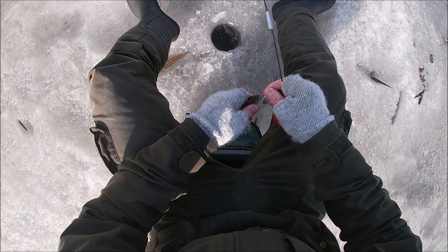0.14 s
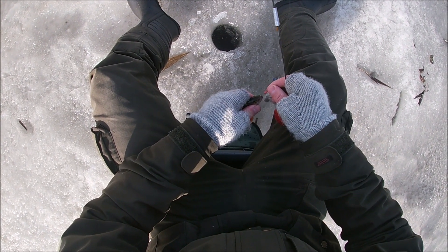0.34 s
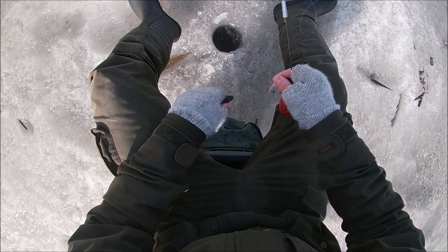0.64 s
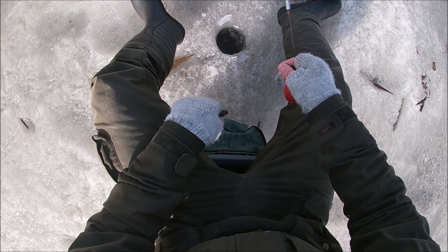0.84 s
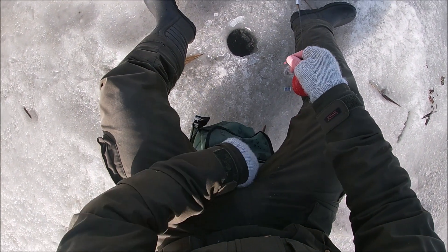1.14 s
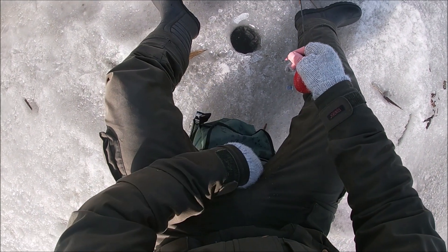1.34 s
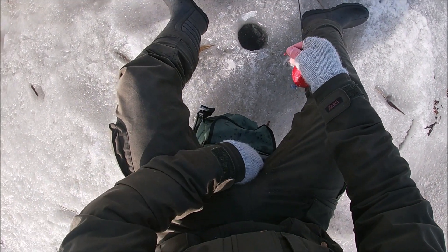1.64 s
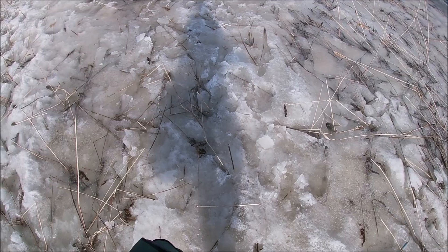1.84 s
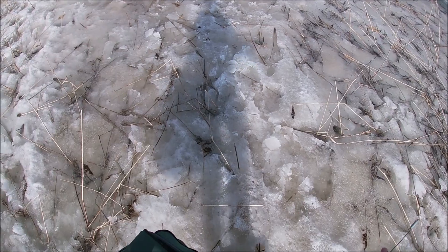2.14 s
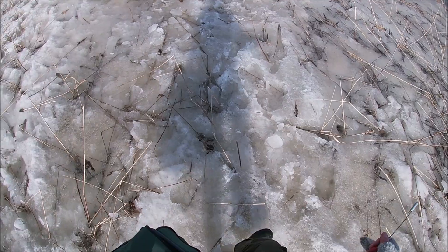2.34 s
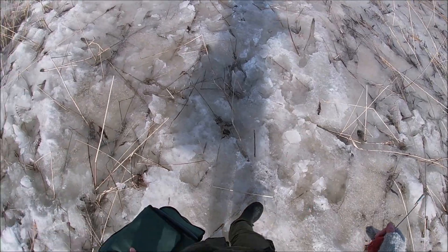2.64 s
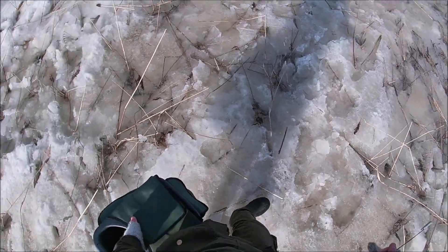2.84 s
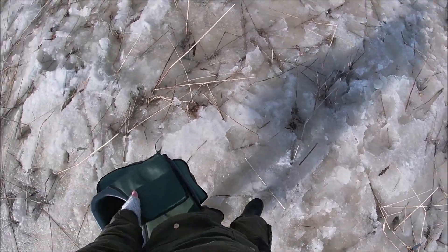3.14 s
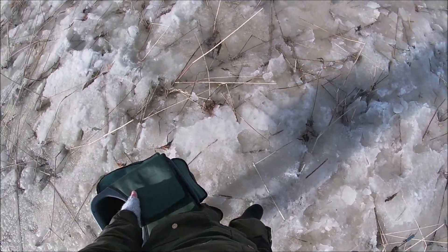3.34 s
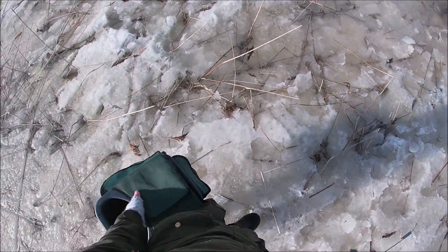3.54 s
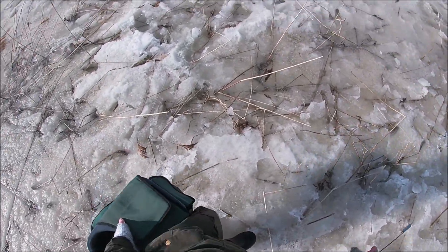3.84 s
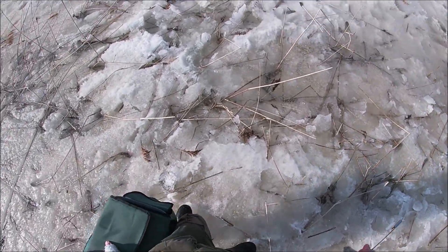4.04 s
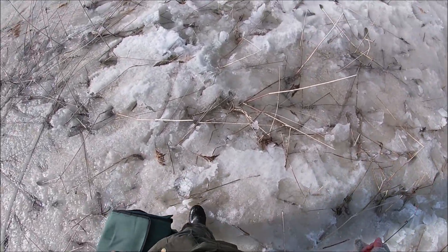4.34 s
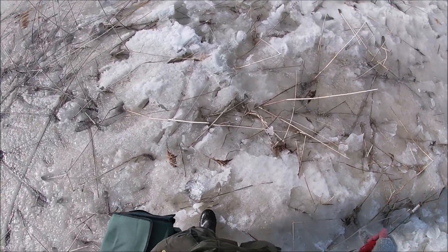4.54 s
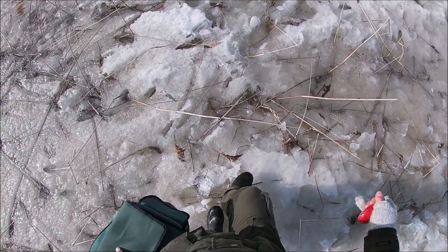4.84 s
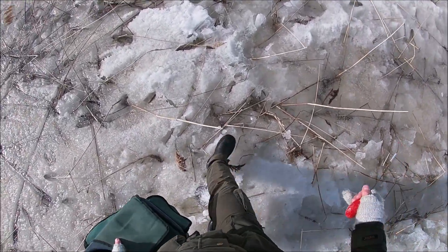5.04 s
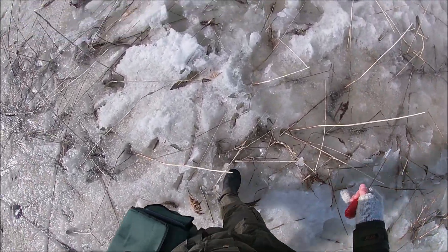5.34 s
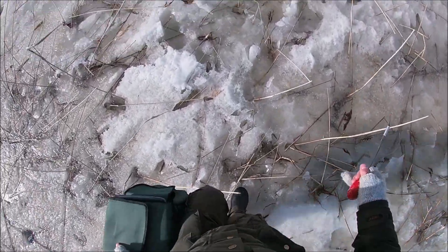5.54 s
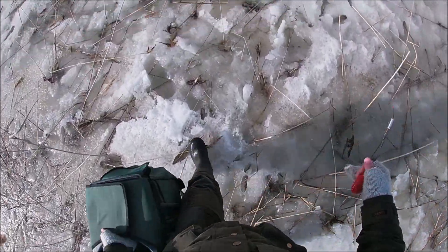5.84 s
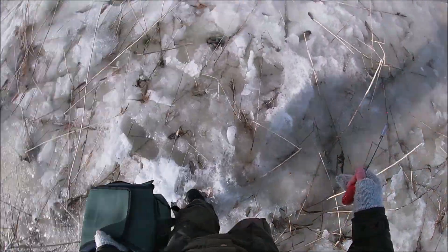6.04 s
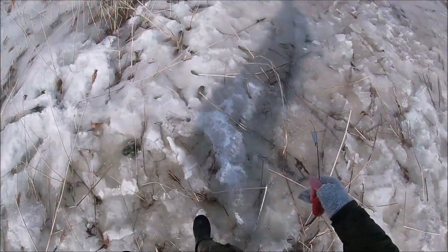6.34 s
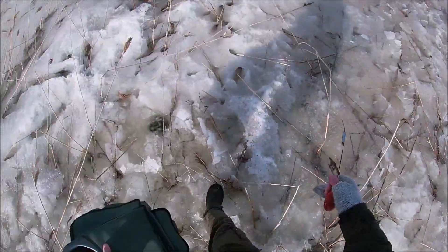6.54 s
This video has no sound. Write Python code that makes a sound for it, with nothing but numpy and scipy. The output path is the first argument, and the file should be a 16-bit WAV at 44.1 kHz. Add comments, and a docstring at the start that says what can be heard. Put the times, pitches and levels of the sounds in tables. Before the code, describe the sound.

After faint handling noise and a wind gust, clothing rubs, boots crush wet ice and dull thumps jolt the microphone.

```python
"""On sea ice, a person handles a bag, then turns and treads into slushy snow.
We hear it through a head-worn camera in a closed case, which gives nearly everything a hollow ring.
Wind buffets the case, heavy clothing rubs, boots crush wet ice grains and a few knocks jolt the mount
that holds the camera. The sound cuts out for a moment just before the first gust."""
import sys
import numpy as np
from scipy import signal
from scipy.fft import rfft, irfft
from scipy.io import wavfile
from scipy.ndimage import uniform_filter1d

SR = 44100
rng = np.random.default_rng(int(sys.argv[2]) if len(sys.argv) > 2 else 0)


def unload_audio(sound):
    """Save the sound as a 16-bit wav file, at the path given as the first command line argument."""
    columns = np.transpose(np.atleast_2d(sound))
    # keep every value between -1 and 1, then stretch to whole-number steps
    steps = np.round(np.clip(columns, -1, 1) * 32767)
    wavfile.write(sys.argv[1], SR, steps.astype(np.int16))


N = 295405
T = np.arange(N) / SR
HZ = np.fft.rfftfreq(8192, 1 / SR)
GAP_START_S, GAP_END_S = 1.695, 1.763  # the moment of silence

# The hollow ring of the case. Each row: pitch in Hz, width in Hz, boost in dB.
CASE_RESONANCES = [(312.4, 75, 4.5), (618, 150, 3), (1003, 199, 14), (1331, 317, 12.5), (1568, 130, 3.5),
                   (2080, 300, 5), (2410, 160, 6.5), (2938, 380, 14), (3350, 160, 3.5), (4150, 140, 4),
                   (4440, 90, 2), (5100, 420, 3), (6100, 1300, 8.5), (8080, 420, 5.5), (9620, 730, 6)]
# The tones of the struck mount. Each row: pitch in Hz, relative level in dB, seconds to fade by 60 dB.
MOUNT_TONES = [(526, 6, 0.018), (746, 0.5, 0.018), (894, -5.5, 0.026), (1053, -7, 0.016),
               (1310, -3.5, 0.031), (2160, -4, 0.0087)]

# How deep or bright each sound starts out. Each row: frequency in Hz, relative level in dB.
SEATED_AIR_SPECTRUM = [(60, 1.5), (250, -13), (500, -30), (750, -25), (1000, -40), (1350, -24.5),
                       (1900, -40.5), (2900, -47.5), (3700, -38), (6000, -46), (8000, -47), (10000, -45),
                       (14000, -63)]
WALKING_AIR_SPECTRUM = [(60, -6), (250, -11), (500, -23), (750, -21), (1000, -38.5), (1350, -32.5),
                        (1900, -44.5), (2900, -49), (3700, -43), (8000, -55.5), (10000, -52),
                        (14000, -60.5)]
SWAY_SPECTRUM = [(8, -8), (20, -0.5), (34, 2.5), (60, -5), (90, -16.5), (140, -34.5), (250, -40.5),
                 (500, -104)]
WIND_SPECTRUM = [(20, 2.5), (65, 8.5), (110, 2), (200, -7.5), (340, -12.5), (500, -25), (740, -16),
                 (870, -27.5), (1130, -23.5), (1500, -36), (2000, -45), (2350, -41), (2650, -43),
                 (3000, -41.5), (3650, -54), (4200, -51.5), (4900, -62), (6000, -67.5), (7500, -96)]
CLOTH_SPECTRUM = [(40, -10), (100, -4.5), (250, -11), (500, -21.5), (850, -24), (1020, -18.5), (1170, -20),
                  (1350, -22.5), (2300, -40), (3000, -49.5), (4000, -70.5), (8000, -65.5)]
RATTLE_SPECTRUM = [(60, 2.5), (200, 11), (500, -19), (800, -9), (1100, -51), (2000, -20), (4000, -9),
                   (8000, -18), (14000, -33.5)]
SLUSH_SPECTRUM = [(60, -9.5), (150, -22), (500, -13.5), (1000, -22.5), (1400, -5), (2000, -19.5),
                  (3000, -18.5), (4000, -19.5), (5200, -24.5), (6500, -37), (8200, -29.5), (12000, -46),
                  (15000, -55)]

# Things that swell and fade. Each row: start in seconds, hold in seconds, relative level in dB.
WEIGHT_SHIFTS = [(0.47, 0.046, -42.5), (0.62, 0.092, -40), (1.04, 0.035, -42), (1.25, 0.25, -44),
                 (1.64, 0.047, -37), (2.8, .15, -41), (3.25, 0.032, -30), (3.47, 0.13, -26.5),
                 (3.73, 0.15, -27.5), (4.05, 0.2, -30.5), (4.33, 0.092, -26), (4.52, 0.045, -31),
                 (4.88, 0.084, -30.5), (5.18, 0.041, -24), (5.3, 0.094, -22.5), (5.63, 0.036, -33.5),
                 (5.81, 0.024, -26), (5.94, 0.046, -15), (6.04, 0.073, -20.5), (6.59, 0.073, -23)]  # the body shakes the mount
WIND_GUSTS = [(1.76, 0.99, -42), (2.29, 0.2, -46), (3.71, 0.4, -53)]
CLOTH_STROKES = [(1.105, .015, -58.5), (1.44, 0.033, -62), (1.63, 0.073, -54.5), (2.62, 0.0098, -51.5),
                 (2.742, 0.0048, -57.5), (3.48, 0.03, -54), (3.58, 0.058, -49.5), (3.71, .1, -45),
                 (3.83, 0.078, -40), (4.02, 0.22, -44.5), (4.3, .2, -52.5), (4.56, 0.065, -55),
                 (4.72, 0.041, -47.5), (4.82, 0.22, -43.5), (5.16, 0.15, -42), (5.35, 0.22, -45.5),
                 (5.66, 0.32, -51.5), (5.95, 0.08, -41), (6.18, 0.02, -57), (6.44, 0.058, -63.5)]  # sleeves, trousers and bag

# As the head turns, a dip in the wind's tone slides down and the bass grows. Each row: time in seconds,
# dip frequency in Hz, dip depth in dB (below zero it is a boost), bass boost in dB.
HEAD_TURN = [(1.76, 1890, -5, -3), (2.301, 1700, -5, -2.5), (2.5, 1490, 6, -4), (2.65, 1510, 11, 5.5),
             (2.899, 1320, 22.5, 7)]
# Small gritty scuffs: crunches of ice, and early on a few dull scrapes of cloth. Each row: start in seconds, #
# relative level in dB, fade time in seconds, treble boost in dB.
SCUFFS = [(0.068, -52.5, 0.016, -8.5), (1.098, -51.5, 0.017, -11), (1.13, -67.5, 0.09, 5.5),
          (1.184, -51, 0.0099, -16), (1.474, -45.5, 0.0066, -14), (3.221, -49, .016, -13),
          (3.483, -51, 0.027, 2.5), (3.689, -54, 0.0069, -6), (3.754, -55, 0.0053, -2),
          (3.829, -37, 0.0044, -12.5), (3.872, -33.5, 0.0059, -16), (4.014, -52, 0.0073, -6),
          (4.171, -36, 0.009, -15), (4.367, -39, 0.0066, -10.5), (5.286, -24, 0.0045, -6),
          (5.411, -39, 0.0088, -13), (5.606, -41, 0.013, -9.5), (5.71, -50.5, 0.019, -2),
          (5.782, -47, 0.02, 9), (5.87, -46, 0.011, -1), (5.971, -27.5, 0.012, -3.5),
          (6.502, -55, 0.011, 6)]
# Blows to the mount, with two faint soft bumps of handling early on. Each row: start in seconds, # thud peak in
# dB, thud pitch in Hz, thud Q (higher rings longer), ring peak in dB, treble limit in Hz # (higher for a harder
# hit), rattle peak in dB, seconds until the rebound.
MOUNT_KNOCKS = [(0.342, -51.5, 325, 6.4, -52, 350, -49, 0.0045),
                (0.688, -67, 250, 1.5, -52, 550, -50, 0.0045),
                (1.428, -32, 302, 0.34, -34.5, 950, -41, 0.0031),
                (3.475, -9.5, 79, 2.8, -38, 170, -48, 0.0059),
                (3.486, -8, 228, 1.36, -22.5, 367, -40, 0.00223),
                (6.1084, -8.5, 199, 2.4, -9.5, 980, -17.5, 0.00415),
                (6.123, -22.5, 292, 3.3, -29, 500, -31, 0.0017),
                (6.212, -26.5, 210, 2.3, -55, 250, -44, 0.0031),
                (6.2263, -4.5, 177, 0.95, -10, 677, -20.5, 0.0028)]
# A boot presses into slush. Each row: start in seconds, hold in seconds, relative level in dB,
# crispness in dB (how strong the treble is next to that level).
BOOT_TREADS = [(3.231, 0.018, -68.5, -8.5), (3.459, 0.064, -65, -9), (3.61, .05, -62, -40),
               (3.696, 0.17, -58.5, -32), (3.867, 0.11, -56.5, -31), (4.012, 0.032, -62, -30),
               (4.176, 0.13, -57.5, -25), (4.347, 0.028, -58.5, -14.5), (4.481, 0.02, -58.5, -13),
               (4.988, .03, -63.5, -25), (5.273, 0.074, -47, -15.5), (5.544, 0.016, -63.5, -5.5),
               (5.812, 0.046, -66, -6), (5.938, 0.14, -44.5, -12.5), (6.591, 0.17, -51.5, -11)]


def amp(db):
    """Turn decibels into a number to multiply by."""
    return 10 ** (np.asarray(db) / 20)


def during(start, end, fade=0.0083):
    """1 between two times and 0 outside, with a fade at each end; all in seconds."""
    return np.clip(np.minimum(T - start, end - T) / fade, 0, 1)


def band(x, low_hz, high_hz):
    """Keep the part of a sound between two frequencies."""
    hz = np.fft.rfftfreq(N, 1 / SR)
    return irfft(rfft(x) * ((hz > low_hz) & (hz < high_hz)), N)


def unit(x, low_hz=0, high_hz=SR):
    """Scale a sound so its average strength (rms) between two frequencies is 1."""
    return x / (np.std(band(x, low_hz, high_hz)) + 1e-15)


def curve(spectrum):
    """Join the rows of a spectrum table into one curve in dB."""
    hz, db = np.transpose(spectrum)
    return np.interp(np.log(HZ + 1), np.log(hz), db)


def in_case(spectrum):
    """The same curve with the ring of the closed case added."""
    ring_db = sum(db / (1 + (2 * (HZ - hz) / width) ** 2) for hz, width, db in CASE_RESONANCES)
    return curve(spectrum) + ring_db


def colour(x, db):
    """Filter a sound by a curve in dB, so that clicks ring only after they strike."""
    log_gain = np.log(amp(np.r_[db, db[-2:0:-1]]))
    response = np.fft.ifft(np.exp(np.conj(signal.hilbert(log_gain)))).real
    return signal.oaconvolve(x, response[:len(response) // 2])[:N]


def flutter(rate_hz, depth_db):
    """A loudness that wavers at random."""
    return amp(depth_db * unit(band(rng.standard_normal(N), 0, rate_hz)))


def grains(per_s, spread_db, hiss):
    """Tiny snaps of unequal size over a smooth hiss."""
    size = amp(spread_db * np.minimum(rng.exponential(1, N), 4))
    snaps = size * rng.choice([-1, 1], N) * (rng.random(N) < per_s / SR)
    return unit(snaps) + hiss * rng.standard_normal(N)


def swells(rows, rise_s, fall_s, sag_db_per_s=0, tail_db=-100, tail_s=1):
    """Loudness that grows, holds, then falls to a faint tail; rise, fall and tail times span 20 dB."""
    t, power = T[::32], 0
    for start, hold, db in rows:
        early, late = np.maximum(start - t, 0), np.maximum(t - start - hold, 0)
        held = amp(db - 20 * early / rise_s - sag_db_per_s * np.clip(t - start, 0, hold))
        fading = np.maximum(amp(-20 * late / fall_s), amp(tail_db - 20 * late / tail_s))
        power = power + (held * fading) ** 2
    return np.interp(T, t, np.sqrt(power))


def gusting():
    """How hard the wind blows: it holds, then drops as the head turns away."""
    return swells(WIND_GUSTS, rise_s=0.18, fall_s=0.045, tail_db=-14, tail_s=0.21) * (T > GAP_START_S)


def ticking(per_s=33, unevenness=0.41, tick_s=0.002, seated_db=-90, walking_db=-97):
    """Very faint, uneven ticking in the highest treble."""
    waits = abs(1 + unevenness * rng.standard_normal(400)) / per_s
    times = np.r_[0, np.cumsum(waits)]
    age = T - times[np.searchsorted(times, T, side="right") - 1]  # seconds since the last tick
    ticks = unit(band(rng.standard_normal(N) * np.exp(-age / tick_s), low_hz=7800, high_hz=12500))
    return ticks * (amp(seated_db) * (T < GAP_START_S) + amp(walking_db) * during(2.3, 8.2, fade=0.29))


def air(seated_db=-55, walking_db=-62):
    """Quiet open air: its low end wavers before the silence, and it is softer and steady after."""
    seated = unit(colour(rng.standard_normal(N), in_case(SEATED_AIR_SPECTRUM)))
    seated = seated + band(seated, 0, 1600) * (flutter(rate_hz=14, depth_db=1.5) - 1)
    walking = unit(colour(rng.standard_normal(N), in_case(WALKING_AIR_SPECTRUM)))
    return np.where(T < GAP_START_S, amp(seated_db) * seated, amp(walking_db) * walking)


def sway(seated_db=-50, standing_db=-49, walking_db=-43, buffet_db=11, steadiness=0.63):
    """The mount wobbles with the body and in the wind, making a deep, lumpy rumble."""
    wobble = colour(rng.standard_normal(N), curve(SWAY_SPECTRUM))
    swing = np.sqrt(uniform_filter1d(abs(signal.hilbert(wobble)) ** 2, size=3000))
    rumble = unit(wobble / swing ** steadiness)  # partly evens out big and small swings
    resting = np.where(T < GAP_START_S, amp(seated_db), amp(standing_db))
    walking = amp(walking_db) * during(3.45, 6.3, fade=0.024)
    shifting = swells(WEIGHT_SHIFTS, rise_s=0.055, fall_s=0.084)
    buffeting = amp(buffet_db) * gusting()
    return rumble * np.sqrt((resting + walking) ** 2 + shifting ** 2 + buffeting ** 2)


def wind(gain_db=-0.5, patchy_db=2, dip_width_hz=420, bass_hz=220):
    """A gust roars over the case and dies as the head turns away; a weaker one follows."""
    eddies = grains(per_s=5000, spread_db=3.5, hiss=1.6) * flutter(rate_hz=50, depth_db=1.5)
    roar = unit(colour(eddies, in_case(WIND_SPECTRUM)), 300, 900)
    hz, t, bands = signal.stft(roar, SR, nperseg=1024)
    turn_s, dip_hz, dip_db, bass_db = np.transpose(HEAD_TURN)
    bands *= amp(np.interp(t, turn_s, bass_db) / (1 + (hz[:, None] / bass_hz) ** 2))
    from_dip_hz = hz[:, None] - np.interp(t, turn_s, dip_hz)
    bands *= amp(-np.interp(t, turn_s, dip_db) / (1 + (2 * from_dip_hz / dip_width_hz) ** 2))
    # swirls of air favour different frequencies from moment to moment
    patches = uniform_filter1d(rng.standard_normal(bands.shape), size=10, axis=0)
    patches = uniform_filter1d(patches, size=4, axis=1)
    bands *= amp(patchy_db * patches / patches.std())
    return signal.istft(bands, SR, nperseg=1024)[1][:N] * gusting() * amp(gain_db)


def clothing(gain_db=-2.24):
    """Coarse cloth catches and slips; the mount carries the sound into the case."""
    slips = grains(per_s=1500, spread_db=5.0, hiss=1.0) * flutter(rate_hz=53, depth_db=2.5)
    rub = unit(colour(slips, in_case(CLOTH_SPECTRUM)), 900, 1150)
    strokes = swells(CLOTH_STROKES, rise_s=0.1, fall_s=0.11, tail_db=-20.5, tail_s=0.22)
    return rub * strokes * amp(gain_db)


def scuffs(rise_s=0.00082, treble_hz=2000):
    """Short gritty bursts start sharply and crumble away; dry ice is brighter than wet, cloth scrapes duller."""
    force, brightness = np.zeros((2, N))
    for start, db, fade_s, treble_db in SCUFFS:
        age = np.maximum(T - start, 0)
        burst = amp(db) * (1 - np.exp(-age / rise_s)) * np.exp(-age / fade_s)
        force += burst
        brightness += amp(treble_db) * burst
    grit = unit(colour(grains(per_s=2100, spread_db=3.0, hiss=0.52), in_case(SLUSH_SPECTRUM)))
    low = band(grit, 0, treble_hz)
    return force * low + brightness * (grit - low)


def knocks(low_hz=40, rattle_s=0.0086, rebound_share=0.75):
    """Each blow pushes the springy mount, sets it ringing and rattles its loose joint."""
    out, hz, t = np.zeros(N), HZ + 1, T[:len(HZ)]
    tones = sum((-1) ** k * amp(db - 60 * t / fade_s) * np.sin(2 * np.pi * pitch * t)
                for k, (pitch, db, fade_s) in enumerate(MOUNT_TONES))
    for start, thud_db, thud_hz, thud_q, ring_db, hard_hz, rattle_db, rebound_s in MOUNT_KNOCKS:
        contact_db = -10 * np.log10(1 + (hz / hard_hz) ** 4)  # soft hits lose their treble
        # the camera on its strap is a damped spring that passes no steady push
        low_cut = hz ** 2 / (hz ** 2 + low_hz ** 2)
        spring = low_cut / abs(1 - (hz / thud_hz) ** 2 + 1j * hz / (thud_hz * thud_q))
        push = colour(signal.unit_impulse(len(t)), 20 * np.log10(spring + 1e-6) + contact_db)
        # part of the push comes back as the mount hits its stop
        age = T[:len(push)]
        thud = push - rebound_share * np.interp(age - rebound_s, age, push, left=0)
        ring = colour(tones, contact_db)
        chatter = rng.standard_normal(len(t)) * np.exp(-t / rattle_s)
        rattle = colour(chatter, curve(RATTLE_SPECTRUM) + contact_db)
        layers = (ring, ring_db), (-thud, thud_db), (rattle, rattle_db)
        blow = sum(amp(db) * layer / abs(layer).max() for layer, db in layers)
        slot = out[round(start * SR):][:len(blow)]
        slot += blow[:len(slot)]
    return out


def crush(per_s, spread_db, low_hz, high_hz):
    """A stream of ice grains breaks, heard through the case and mostly between two frequencies."""
    snaps = grains(per_s, spread_db, hiss=1.0) * flutter(rate_hz=37, depth_db=2.5)
    edges_db = -10 * np.log10((1 + (low_hz / (HZ + 20)) ** 10) * (1 + (HZ / high_hz) ** 10))
    return colour(snaps, np.maximum(in_case(SLUSH_SPECTRUM) + edges_db, -110))


def boots(gain_db=-1.0, body_hz=2100, crisp_hz=3600, muffle=0.36, firm_db=-11.0, fizz_db=-88):
    """Soles crush wet ice: hard treads are full and crisp, soft ones mostly ring the case near 3 kHz."""
    start, hold, db, crispness_db = np.transpose(BOOT_TREADS)

    def pressure(tread_db):
        """The sole presses down and eases off, then the slush settles."""
        treads = zip(start, hold, tread_db)
        return swells(treads, rise_s=0.039, fall_s=0.037, sag_db_per_s=36.5, tail_db=-9, tail_s=0.27)

    body = crush(per_s=900, spread_db=1, low_hz=40, high_hz=body_hz)
    grit = crush(per_s=450, spread_db=5.0, low_hz=body_hz, high_hz=crisp_hz)
    crisp = crush(per_s=800, spread_db=0.5, low_hz=crisp_hz, high_hz=15000)
    grit_strength = np.std(band(grit + crisp, 2600, 6000))
    crisp = unit(crisp, 4800, 11000)
    squash_db = muffle * np.minimum(crispness_db - firm_db, 0)  # a soft tread also loses its low body
    crunch = (grit * pressure(db) + body * pressure(db + squash_db)) / grit_strength
    crunch += crisp * pressure(db + crispness_db)
    fizz = crisp * amp(fizz_db) * during(3.33, 6.3, fade=0.1)  # loose grains under shifting feet
    return crunch * amp(gain_db) + fizz


def scene():
    """Add up all the sounds at the one microphone."""
    return (air() + sway() + wind() + clothing() + boots() + scuffs() + knocks() + ticking())[None]


def record(dry, top_hz=14500):
    """Cut the sound out for a moment, then take off the very highest treble."""
    heard = dry * ((T < GAP_START_S) + during(GAP_END_S, 7, fade=0.00073))
    treble_cut = signal.firwin(255, top_hz, window=("kaiser", 9), fs=SR)
    return signal.oaconvolve(heard, treble_cut[None], "same")


dry = scene()
out = record(dry)
unload_audio(out)
```